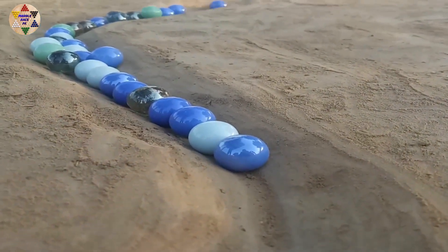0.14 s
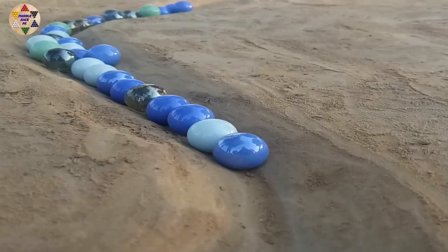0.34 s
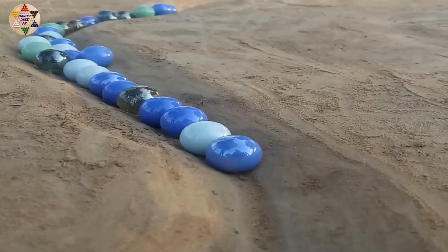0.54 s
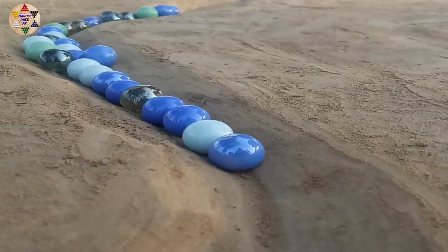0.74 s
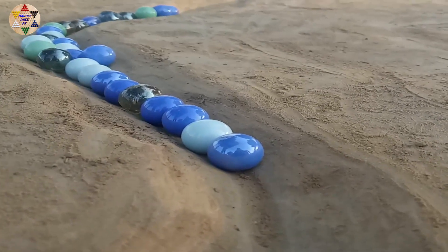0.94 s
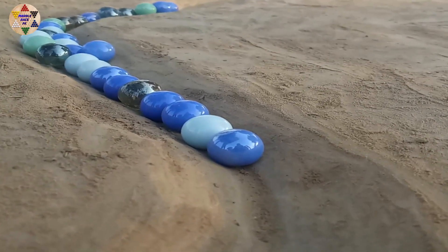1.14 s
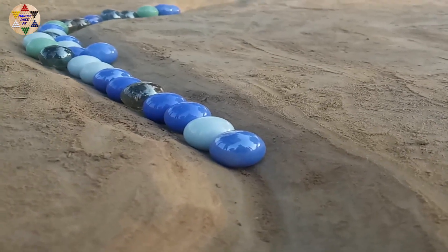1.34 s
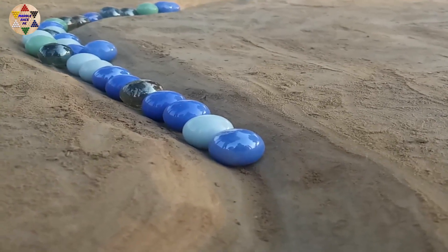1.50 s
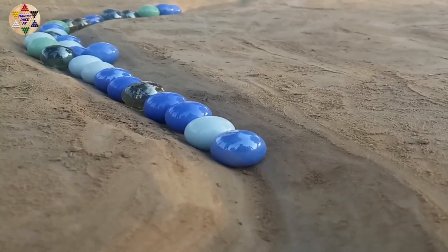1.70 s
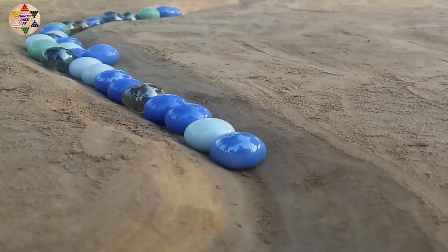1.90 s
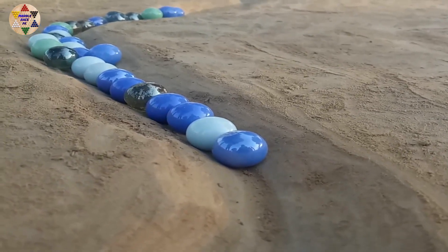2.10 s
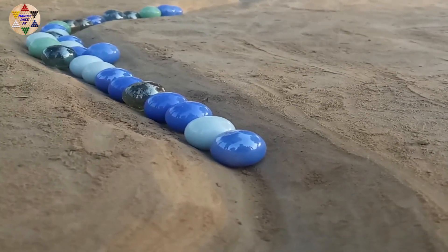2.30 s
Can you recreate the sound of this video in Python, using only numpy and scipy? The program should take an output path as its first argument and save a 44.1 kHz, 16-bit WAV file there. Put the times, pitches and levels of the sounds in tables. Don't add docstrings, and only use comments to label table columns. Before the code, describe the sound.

Close, bright marble clacks come in quick uneven bursts, with a blunt bump against the recording device early on, a sparse middle, two denser runs, and fainter clicks at the end over sand hiss.

```python
import sys
import numpy as np
from scipy import signal
from scipy.fft import rfft, irfft
from scipy.io import wavfile
from scipy.ndimage import uniform_filter1d

SR = 44100
rng = np.random.default_rng(int(sys.argv[2]) if len(sys.argv) > 2 else 0)


def level_to_linear(level):
    exponent = np.asarray(level, float) / 20
    return 10 ** exponent


def to_wav(sig):
    pcm = np.clip(np.atleast_2d(sig), -1, 1) * 32767
    pcm = np.round(pcm).astype(np.int16)
    wavfile.write(sys.argv[1], SR, pcm.T)


N = 103635


def spectrum_level(table, hz):
    f, db = np.array(table, float).T
    return np.interp(np.log(np.maximum(hz, 1)), np.log(f), db)


def minimum_phase(db, size):
    cepstrum = irfft(db * np.log(10) / 20, size)
    cepstrum[1:size // 2] *= 2
    cepstrum[size // 2 + 1:] = 0
    return np.exp(rfft(cepstrum))


def resonance(x, hz, width_hz):
    return signal.lfilter(*signal.iirpeak(hz, hz / width_hz, fs=SR), x)


def slow_wander(rate_hz):
    k = int(SR / rate_hz)
    steps = np.repeat(rng.standard_normal(N // k + 1), k)
    smooth = uniform_filter1d(uniform_filter1d(steps, k), k)[:N]
    return smooth / smooth.std()


def follow(table):
    return np.interp(np.arange(N) / SR, *np.array(table).T)


def highpass(x, hz):
    return signal.sosfilt(signal.butter(2, hz, "high", fs=SR, output="sos"), x)


# [f/Hz, level/dB]
LEFT_PORT_COLOUR = [(600, -4), (2300, 7), (4400, 4.5), (5300, -5), (7200, 0), (8800, -14), (11500, -15),
                    (15500, -21)]
RIGHT_PORT_COLOUR = [(600, -10), (2200, -12.5), (4300, -4.5), (5300, -18.5), (7200, -7.5), (8800, -27),
                     (11500, -23.5), (15500, -39.5)]
PITCH_LIFT_DB, PITCH_WIDTH = 8.5, 0.3
LEFT_LAG_S, LAG_SCATTER_S, PAN_SCATTER_DB = 0.00021, 0.00002, 3.5
ECHO_DB, ECHO_DECAY_S = -14, 0.00077


def impact_pulses(s, db, hz, size=512):
    f = np.arange(size // 2 + 1) * SR / size
    octave_offset = np.log(np.maximum(f, 1) / hz[:, None]) / PITCH_WIDTH
    lift = level_to_linear(PITCH_LIFT_DB * np.exp(-0.5 * octave_offset ** 2))

    start = (s * SR).astype(int) - size // 8
    delay = np.exp(-2j * np.pi * f * (s - start / SR)[:, None])

    scatter = rng.standard_normal((len(s), 2))
    lead_s = LEFT_LAG_S + LAG_SCATTER_S * scatter[:, :1]
    right_lead = np.exp(2j * np.pi * f * lead_s) * level_to_linear(PAN_SCATTER_DB * scatter[:, 1:])

    fade = level_to_linear(ECHO_DB) * np.exp(-np.arange(size // 2) / (ECHO_DECAY_S * SR))
    tail = np.cumsum(rng.standard_normal((len(s), 2, size // 2)), axis=1) / np.sqrt([[1], [2]])
    echo = 1 + rfft(tail * fade, size)

    left = minimum_phase(spectrum_level(LEFT_PORT_COLOUR, f), size)
    right = minimum_phase(spectrum_level(RIGHT_PORT_COLOUR, f), size) * right_lead
    pulses = [irfft(-port * lift * delay * echo[:, ch], size) for ch, port in enumerate([left, right])]
    gain = level_to_linear(db) / np.abs(pulses[0]).max(axis=1)
    out = np.zeros((2, N + 2 * size))
    where = np.clip(start, -size, N)[:, None] + size + np.arange(size)
    for ch in range(2):
        np.add.at(out[ch], where, pulses[ch] * gain[:, None])
    return out[:, size:size + N]


# [t/s, level/dB]
FAR_BUSYNESS = [(0, -39.5), (.27, -47), (.33, -70), (.7, -57.5), (1.03, -41), (1.13, -42), (1.35, -38.5),
                (1.52, -56.5), (1.62, -41.5), (1.72, -34.5), (1.78, -30.5), (1.84, -30), (1.98, -33.5),
                (2.0, -39), (2.03, -34.5), (2.1, -45.5), (2.35, -71)]
PATTER_DB, PATTER_SCATTER_DB, PATTER_HZ, BLUR_DB = 6.5, 5.5, 2920, -5.5


def patter(count=1000, blur_count=1800):
    u = rng.random((count + blur_count, 3))
    s = u[:, 0] * (N - 1) / SR
    db = np.interp(s, *np.array(FAR_BUSYNESS).T) + PATTER_DB
    db -= PATTER_SCATTER_DB * np.log(0.013 + u[:, 1])
    db += 0.41 * slow_wander(40.2)[(s * SR).astype(int)]
    db[count:] += BLUR_DB
    return impact_pulses(s, db, PATTER_HZ * np.exp(0.9 * (u[:, 2] - 0.5)))


# [f/Hz, level/dB per Hz]
LEFT_HISS_COLOUR = [(250, -4.5), (500, 2.5), (1300, 8), (2500, 1), (4400, -7.5), (5100, -26), (7500, -22.5),
                    (9000, -35.5)]
RIGHT_HISS_COLOUR = [(250, -28), (500, -2.5), (1300, -10), (2500, -20), (4400, -13), (5100, -39),
                     (7500, -40), (9000, -45)]
# [t/s, level/dB]
SAND_RUSH = [(0, 0), (.9, 0), (1.3, 2.5), (1.5, 1), (1.63, 0.5), (1.7, -2.5), (2.35, -3)]
HISS_DB, ALIKE_BELOW_HZ = -37.5, 1350


def sand_hiss():
    f = np.arange(N // 2 + 1) * SR / N
    flutter = level_to_linear(1.5 * slow_wander(25) + 0.6 * slow_wander(3))
    a, b = rfft(rng.standard_normal((2, N)) * flutter)
    alike = 1 / np.sqrt(1 + (f / ALIKE_BELOW_HZ) ** 4)
    left = a * level_to_linear(spectrum_level(LEFT_HISS_COLOUR, f))
    right = (alike * a + np.sqrt(1 - alike ** 2) * b) * level_to_linear(spectrum_level(RIGHT_HISS_COLOUR, f))
    out = highpass(irfft([left, right], N), 150)
    return out * level_to_linear(HISS_DB) / out[0].std() * level_to_linear(follow(SAND_RUSH))


# [t/s, level/dB]
WIND_GUSTS = [(0, -0.5), (.4, 6), (.95, 1), (1.1, -2), (1.3, 2), (1.6, 5.5), (1.66, -9), (1.85, -5),
              (2.0, 0.5), (2.35, 4)]
WIND_DB, WIND_HZ, WIND_WIDTH_HZ, WIND_RIGHT_DB = -44, 98, 81, -7


def wind():
    rumble = resonance(rng.standard_normal(N), WIND_HZ, WIND_WIDTH_HZ)
    rumble = resonance(rumble, WIND_HZ, 2 * WIND_WIDTH_HZ)
    port_gain = level_to_linear(np.array([[0], [WIND_RIGHT_DB]]))
    return rumble / rumble.std() * level_to_linear(WIND_DB + follow(WIND_GUSTS)) * port_gain


# [t/s, peak level/dB, f/Hz]
NEAR_CLACKS = [(0.0146, -8, 3980), (0.0283, -10, 3020), (0.0395, -17, 3200), (0.0555, -10, 2940),
               (0.0651, -17, 2700), (0.0884, -16, 3730), (0.0938, -14, 1530), (0.1011, -16, 2880),
               (0.1053, -15, 2870), (0.12, -9, 4150), (0.1221, -15, 3680), (0.1316, -15, 2920),
               (0.1524, -11, 3120), (0.1589, -16, 2300), (0.1749, -9, 3440), (0.1786, -19, 3220),
               (0.1933, -22, 2890), (0.2128, -9, 4200), (0.2149, -8, 3350), (0.2171, -9, 3680),
               (0.239, -16, 3560), (0.2412, -20, 3210), (0.258, -9, 3350), (0.2657, -8, 2960),
               (0.2803, -22, 2340), (0.2936, -15, 1740), (0.305, -16, 4630), (0.3074, -9, 3430),
               (0.3229, -5, 4410), (0.3498, -11, 3450), (0.36, -21, 4390), (0.3655, -18, 3210),
               (0.3681, -20, 3890), (0.3736, -18, 1750), (0.3805, -10, 2450), (0.3996, -15, 1520),
               (0.4013, -11, 3460), (0.4037, -18, 1930), (0.4285, -10, 3470), (0.4308, -11, 3280),
               (0.4457, -8, 3510), (0.5393, -16, 2210), (0.5541, -20, 4000), (0.5628, -15, 3610),
               (0.575, -8, 2580), (0.5768, -8, 3730), (0.6143, -15, 2290), (0.6216, -22, 1400),
               (0.6304, -10, 2670), (0.6682, -21, 2530), (0.6829, -17, 1350), (0.6888, -8, 2340),
               (0.7115, -20, 3290), (0.7977, -9, 2550), (0.9507, -7, 2610), (0.9531, -13, 2520),
               (1.0063, -9, 3470), (1.0313, -18, 2800), (1.0332, -1, 3160),
               (1.0758, -15, 2400), (1.0852, -20, 3700), (1.0886, -20, 2740), (1.0988, -18, 3290),
                 (1.1051, -9, 3160), (1.115, -7, 3570), (1.1168, -14, 3270), (1.119, -19, 3500),
                 (1.1539, -15, 3570), (1.1596, -16, 3360), (1.1637, -8, 3120), (1.167, -11, 2750),
                 (1.1716, -13, 3290), (1.1775, -16, 2670), (1.1822, -12, 3200), (1.1917, -7, 2810),
                 (1.1947, -10, 2690), (1.2006, -18, 2920), (1.2031, -20, 2100), (1.2227, -18, 2320),
                 (1.231, -19, 3090), (1.2414, -19, 2440), (1.2474, -15, 2890), (1.2557, -15, 2590),
                 (1.2606, -10, 2870), (1.2659, -20, 1690), (1.2769, -15, 3240), (1.2923, -14, 3380),
                 (1.3009, -15, 3160), (1.3067, -19, 3870), (1.3117, -18, 4000), (1.3193, -9, 2120),
                 (1.3285, -17, 2090), (1.3391, -11, 4160), (1.3634, -9, 3410), (1.3659, -15, 2720),
                 (1.3889, -13, 3350), (1.3967, -16, 3860), (1.4285, -13, 2480), (1.4462, -12, 2790),
                 (1.4795, -25, 2200), (1.4897, -20, 2370), (1.5039, -19, 2740), (1.5078, -20, 1450),
                 (1.6388, -5, 2760), (1.6453, -9, 3040), (1.6702, -6, 2380), (1.6745, -18, 3350),
                 (1.6999, -12, 2860), (1.7051, -12, 4440), (1.7072, -9, 2690), (1.7123, -6, 3620),
                 (1.7154, -12, 2920), (1.7295, -17, 4110), (1.7332, -11, 3760), (1.7351, -15, 3770),
                 (1.741, -13, 3220), (1.7505, -7, 3260), (1.7564, -5, 2530),
               (1.7886, -14, 3200), (1.7963, -10, 2880), (1.808, -6, 4060), (1.8102, -13, 1990),
                (1.8141, -14, 3090), (1.8196, -6, 3720), (1.8214, -18, 4420), (1.8239, -17, 3500),
                (1.8369, -15, 2290), (1.8452, -17, 2070), (1.8506, -16, 3060), (1.8616, -14, 3270),
                (1.8773, -12, 2910), (1.8938, -12, 2910), (1.8964, -17, 3170), (1.899, -12, 2820),
                (1.9044, -15, 3250), (1.9186, -16, 3310), (1.9245, -8, 3560), (1.9273, -15, 3620),
                (1.931, -17, 3550), (1.9378, -18, 2800), (1.9428, -13, 2920), (1.9479, -8, 3220),
                (1.9521, -10, 2800), (1.958, -12, 2780), (1.9668, -12, 3470), (1.9737, -16, 2650),
                (1.9764, -8, 3730), (1.9802, -14, 2550), (1.9839, -17, 3020), (2.0128, -15, 3180),
                (2.0212, -16, 2830), (2.024, -17, 2440), (2.0322, -17, 2830), (2.0337, -16, 2980),
                (2.0402, -11, 2470), (2.0515, -13, 1330), (2.0546, -14, 3430), (2.0673, -10, 3010),
                (2.0763, -15, 3090), (2.0829, -16, 4550), (2.0882, -19, 4120), (2.0902, -17, 1740),
                (2.1205, -15, 2470), (2.1239, -16, 3920), (2.1346, -19, 2910), (2.1375, -11, 2770),
                (2.1454, -15, 3320), (2.1633, -7, 2540), (2.1722, -21, 2950), (2.2072, -17, 2080),
                (2.2119, -19, 3660), (2.2189, -18, 3910), (2.2273, -14, 1800), (2.2332, -19, 2910),
                (2.2892, -23, 3270), (2.297, -22, 1930), (2.3356, -22, 1880)]
# [t/s, peak level/dB, f/Hz]
KNOCK_CLACKS = [(0.46, -27, 3000), (0.47, -12, 2000), (0.4831, -23, 3000), (.532, -23, 3300)]
CLACK_DB, GRAZE_DB, REBOUND_DB = 1, -21, -8
REBOUND_S, REBOUND_SCATTER_DB = 0.001608, 5


def clacks():
    contacts = NEAR_CLACKS + KNOCK_CLACKS
    s, db, hz = np.array(contacts, float).T
    gap = rng.random((len(s), 2))
    scatter = rng.standard_normal((len(s), 4))
    more_s = s[:, None] + REBOUND_S * (0.5 + gap) * [-1, 1]
    more_db = db[:, None] + [GRAZE_DB, REBOUND_DB]
    more_db = more_db + REBOUND_SCATTER_DB * np.clip(scatter[:, :2], -2, 1)
    more_hz = hz[:, None] * np.exp(0.28 * scatter[:, 2:])
    all_db = CLACK_DB + np.r_[db, more_db.ravel()]
    return impact_pulses(np.r_[s, more_s.ravel()], all_db, np.r_[hz, more_hz.ravel()])


# [t/s, depth level/dB]
GAIN_DIPS = [(.325, -1.5), (0.476, -19), (1.036, -7), (1.117, -7), (1.195, -8), (1.648, -7.5),
             (1.673, -8.5), (1.759, -9), (1.823, -8.5), (2.164, -5)]
HOLD_S, RELEASE_S = 0.017, 0.026


def ducking():
    t = np.arange(N) / SR
    dips = []
    for s, depth_db in GAIN_DIPS:
        recovery = np.exp(-np.maximum(t - s - HOLD_S, 0) / RELEASE_S)
        dips.append(depth_db * (t > s) * recovery)
    return level_to_linear(uniform_filter1d(np.min(dips, axis=0), size=100))


# [t/s, signed push, push length/s]
CASE_KNOCKS = [
    (.45862, -.457, .00027),
    (.4687, -.97, .00015),
    (.4708, .18, .00036),
    (.8333, .37, .0011),
    (.8337, -.1, .0003),
    (.8381, .325, .0033),
]
# [f/Hz, width/Hz, signed gain]
CASE_MODES = [
    [(93, 24, -11.5), (165, 63, -1.4), (478, 215, 2.8), (931, 175, -1.6)],
    [(94, 26, -7), (168, 78, -1.3), (310, 198, 2.05), (617, 690, -1.95)],
]
DIRECT_GAIN, RIGHT_LATE_S, KNOCK_CUT_HZ = (1.23, 1.055), 0.0003, 159


def knocks():
    t = np.arange(N) / SR
    out = np.zeros((2, N))
    for ch in range(2):
        push = np.zeros(N)
        for s, strength, length_s in CASE_KNOCKS:
            push += strength * np.exp(-0.5 * ((t - s - ch * RIGHT_LATE_S) / length_s) ** 2)
        push = highpass(push, KNOCK_CUT_HZ)
        out[ch] = DIRECT_GAIN[ch] * push
        for hz, width_hz, gain in CASE_MODES[ch]:
            out[ch] += gain * resonance(push, hz, width_hz)
    return out


def scene():
    background = patter() + sand_hiss() + wind()
    return clacks() + knocks() + background * ducking()


def top_cut(x):
    return signal.sosfilt(signal.butter(12, 17040, fs=SR, output="sos"), x)


def record(dry):
    lowpass = signal.ellip(6, 0.3, 50, 16000, fs=SR, output="sos")
    mix = signal.sosfilt(lowpass, np.clip(dry, -1, 1))
    return top_cut(np.clip(mix, -1, 1))


dry = scene()
out = record(dry)
to_wav(out)
```